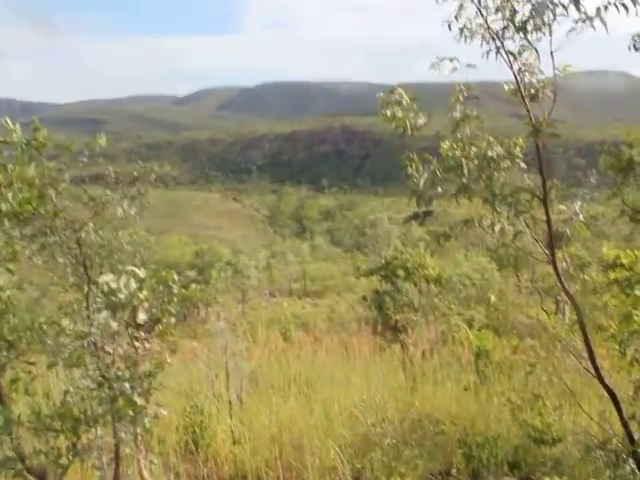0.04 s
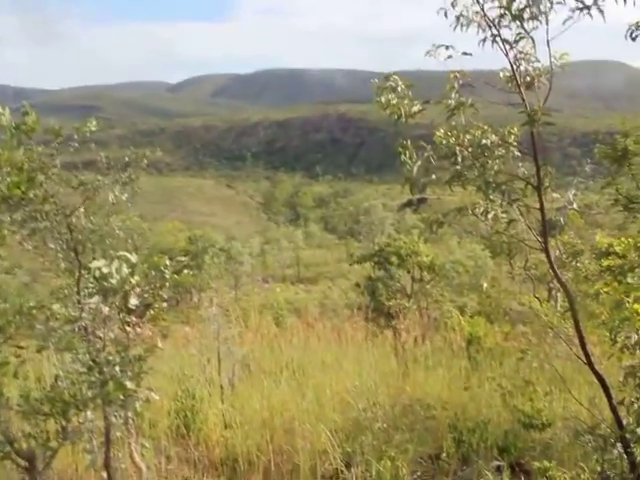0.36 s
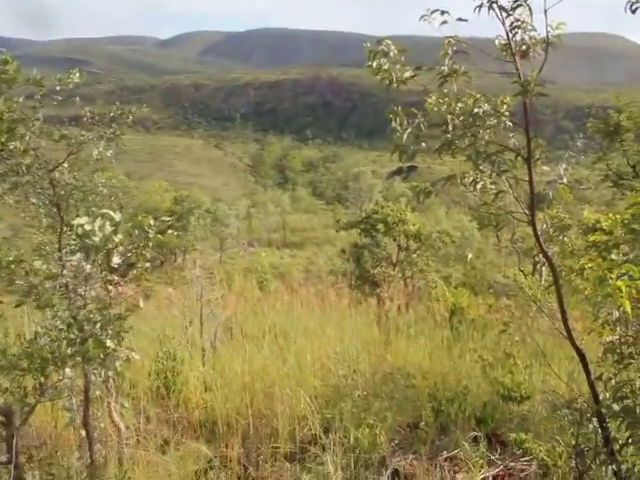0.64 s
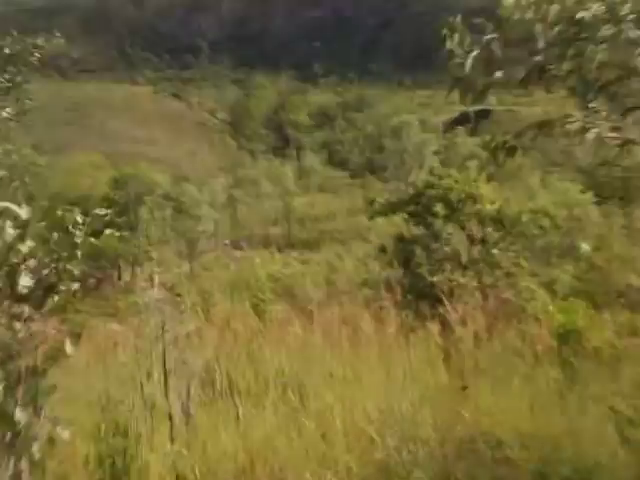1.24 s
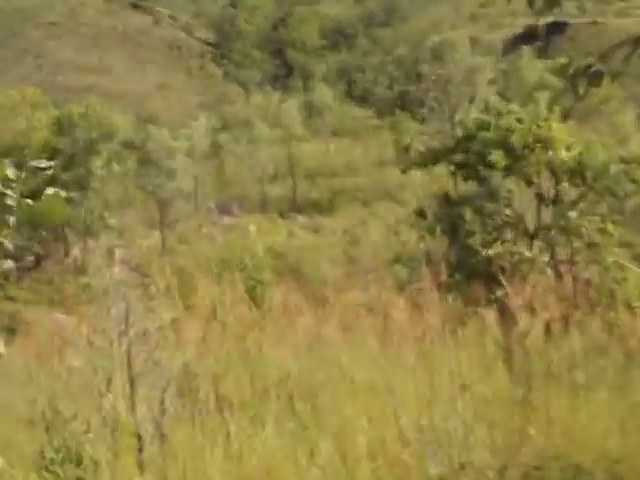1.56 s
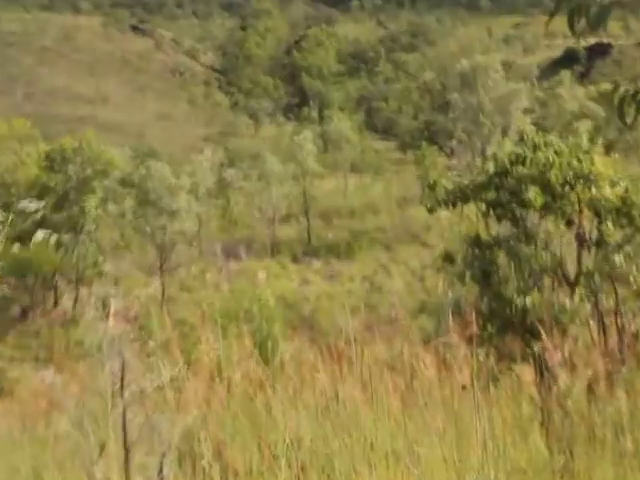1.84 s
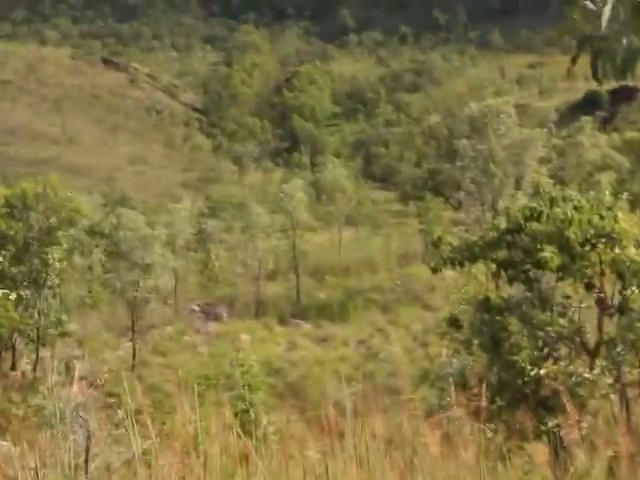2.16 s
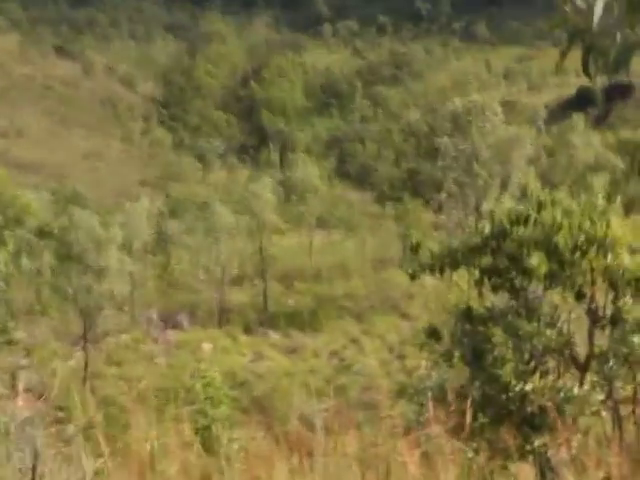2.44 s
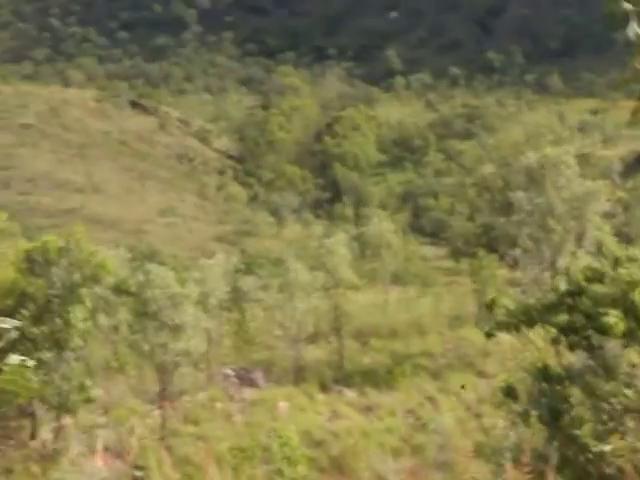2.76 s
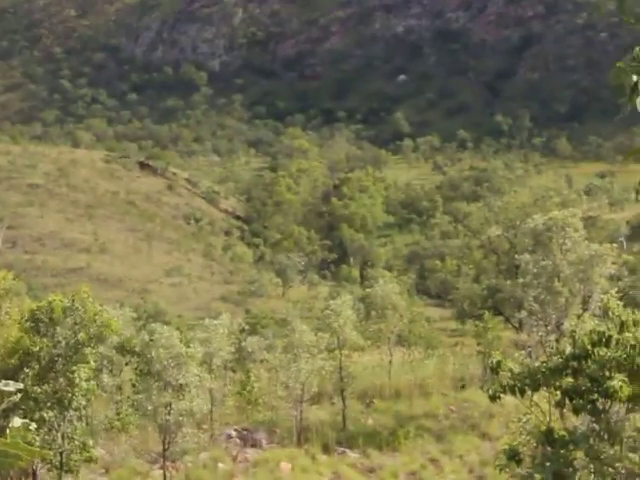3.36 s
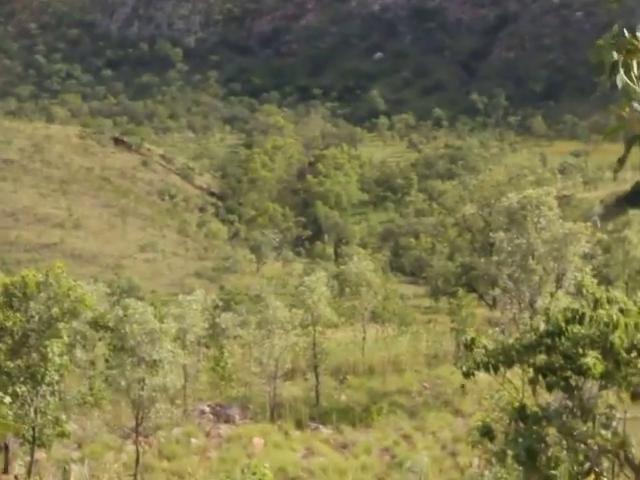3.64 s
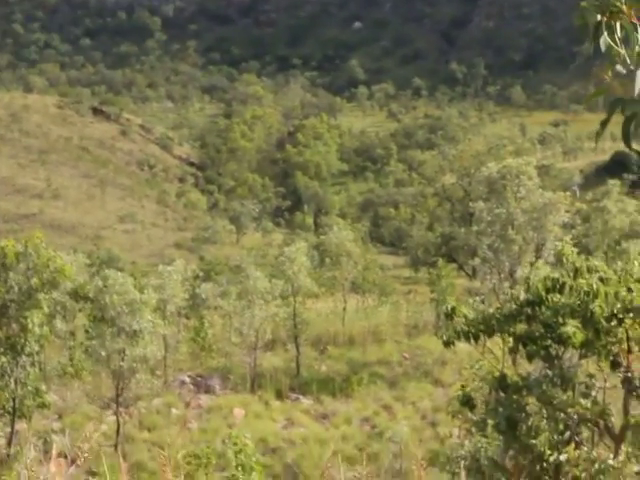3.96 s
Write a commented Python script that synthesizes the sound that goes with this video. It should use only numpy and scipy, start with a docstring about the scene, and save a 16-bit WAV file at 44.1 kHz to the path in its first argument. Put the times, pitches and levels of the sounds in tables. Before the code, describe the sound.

A songbird whistles pure notes and falling slurs in an open valley: at the start, around 1.5 to 1.9 seconds, then repeatedly from 2.5. A close, high cricket chirps about six times a second throughout, over faint air and distant insects. Fingers rub and knock the camera from 0.9 to 2.4, ending with the sharpest knock. Dry rustles follow; another bird squeaks at 2.7 and rasps at 3.5 and 3.8.

```python
"""A songbird whistles slow, pure notes and slurs across a grassy valley, while a close cricket chirps
about six times a second, each chirp a run of wing strokes. In the middle, fingers rub, creak and knock
on the camera body. Later come dry rustles, and a second bird squeaks and rasps twice from the trees.
A few dry snaps dot the scene; faint air and a far insect chorus lie underneath."""
import sys
import numpy as np
from scipy import signal
from scipy.fft import rfft, irfft
from scipy.io import wavfile
from scipy.ndimage import uniform_filter1d

SR = 44100
rng = np.random.default_rng(int(sys.argv[2]) if len(sys.argv) > 2 else 0)


def pcm_store(signal):
    """Save signal as 16-bit PCM."""
    levels = np.round(np.clip(np.atleast_2d(signal), -1, 1) * 32767)
    wavfile.write(sys.argv[1], SR, levels.astype(np.int16).T)


N = 176400
T = np.arange(N) / SR

# The songbird's tune. Each row: start and length in seconds, first and last pitch in Hz, glide
# exponent (higher bends later), level in dB, crest of the swell as a share of the length.
SONG_NOTES = [(-.05, 0.4635, 1497, 1474, 1.97, -32, 0.314), (1.544, 0.1287, 1317, 989, 7.1, -26, 0.817),
              (1.794, 0.1362, 1168, 1138, 1.72, -29, 0.543),
              (2.45, 0.4989, 1243, 1273, 0.216, -28.5, 0.619),
              (3.075, 0.0621, 1499, 592.4, 1.164, -31.5, 0.301),
              (3.19, 0.0959, 1825, 1662, 0.318, -24, 0.592), (3.403, 0.1964, 1503, 1445, 0.81, -24, 0.701),
              (3.646, 0.0802, 1377, 807, 3.49, -31, 0.559), (3.825, 0.169, 916, 914.7, 0.77, -44, 0.643)]
# The second bird's rasps. Each row: start and length in seconds, level in dB.
RASP_CALLS = [(3.546, .08, -27.5), (3.795, .073, -28)]
# Its throat. Each row: frequency in Hz, relative gain in dB.
THROAT_EQ = [(1500, -46.5), (2200, -20.5), (2950, -19.5), (3400, -31), (4500, -7), (5100, -1.5),
             (5800, -24), (15000, -35.5)]
# Its squeaks. Each row: start and length in seconds, first, middle and last pitch in Hz, level in dB.
SQUEAK_NOTES = [(2.651, 0.026, 2265, 2311, 2520, -45.5), (2.67, 0.0384, 3056, 2608, 2729, -38),
                (3.772, 0.041, 2284, 2217, 2215, -37.5)]
# A squeak's timbre. Each entry: gain of one harmonic in dB, from the fundamental up.
SQUEAK_HARMONICS_DB = [-4, 0, -10, -13, -16]
# The cricket's rhythm. Each entry: time of a chirp's last stroke in seconds.
CHIRP_ENDS = [0.1399, 0.316, 0.4847, 0.6542, 0.836, 1.0068, 1.191, 1.361, 1.5318, 1.702, 1.8755, 2.06,
              2.231, 2.4116, 2.5854, 2.7612, 2.9328, 3.1053, 3.277, 3.4588, 3.64, 3.811, 3.9809]
# Its vigour. Each row: time in seconds, full-strength strokes per chirp, base level in dB.
CRICKET_VIGOUR = [(1.4, 4, -32), (2.8, 5.4, -29.5)]
# Finger rubs. Each row: start and length in seconds, bass level in dB, treble over bass in dB.
FINGER_RUBS = [(.885, 0.0171, -21.5, 1), (0.907, 0.0459, -29, -10), (1.025, 0.0068, -20.5, -4.5),
               (1.036, 0.01366, -25, -7.5), (1.057, 0.1751, -31, -8.5), (1.28, 0.041, -35, -6.5),
               (1.322, 0.2047, -32.5, -4.5), (1.573, 0.03636, -31.5, -1), (1.669, 0.04024, -34.5, -4),
               (1.729, 0.00728, -32, -1.5), (1.786, 0.01303, -27, -2), (1.797, 0.0403, -35.5, -3.5),
               (1.877, 0.1594, -35.5, -2), (2.053, 0.0611, -37.5, -5.5), (2.178, 0.0418, -34.5, -1.5),
               (2.284, 0.015, -29.5, -3.5), (2.294, 0.0247, -33, -5), (2.385, 0.0271, -27, -8.5),
               (2.447, 0.0102, -36, 0)]
# The rubbed shell. Each row: frequency in Hz, relative gain in dB.
SHELL_EQ = [(25, -41), (45, -10.5), (307, -1), (800, -1.5), (2030, 3), (2500, -1.5), (4010, 3), (6400, -11),
            (15500, -17.5)]
# Singing finger drags. Each row: start and length in seconds, centre and width in Hz, level in dB.
FINGER_DRAGS = [(1.318, 0.152, 3835, 650, -36), (1.817, 0.167, 3465, 453, -40),
                (1.976, 0.059, 3320, 605, -30.5)]
# The creaking shell. Each row: frequency in Hz, relative gain in dB.
CREAK_EQ = [(160, -15), (480, 5), (1000, -15.5), (1700, 2.5), (5500, -14.5), (7000, -38)]
# Knocks on the body. Each row: start in seconds, peak in dB, decay time in seconds.
KNOCK_HITS = [(0.8895, -23, 0.00075), (.8995, -8, 0.00115), (1.022, -11.5, 0.0017), (1.5735, -15, 0.00102),
              (1.5958, -16, .0006), (1.7856, -6, 0.001), (2.2804, -7, 0.001006), (2.3854, -10.5, 0.00117),
              (2.4128, 4, 0.000903)]
# The knocked shell. Each row: frequency in Hz, relative gain in dB.
KNOCK_EQ = [(60, -4.5), (200, -6.5), (1800, 2.5), (4000, -8), (8000, -19.5)]
# Thuds that shake the case. Each row: start in seconds, strength in dB.
THUD_HITS = [(.9218, -9), (2.415, -5.5)]
# The case's modes. Each row: frequency in Hz, gain in dB, seconds to die away by 60 dB.
CASE_MODES = [(203.6, -14.5, 0.0226), (405, -19.5, 0.02), (994, -11.5, 0.0375)]
# Dry snaps. Each row: start in seconds, centre in Hz, peak in dB, decay time in seconds.
SNAP_HITS = [(.549, 3237, -27, 0.0044), (1.294, 3850, -13, 0.00048), (1.733, 4200, -20, 0.0036),
             (2.452, 4240, -22, 0.0044)]
# Dry rustles. Each row: start and length in seconds, level in dB.
RUSTLE_BURSTS = [(2.84, 0.0104, -36), (2.999, 0.0318, -38), (3.047, .003, -33.5), (3.325, 0.0121, -35.5),
                 (3.485, 0.0071, -32.5), (3.5, 0.0065, -24), (3.529, 0.0302, -32), (3.657, 0.0032, -29.5)]
# The colour of rustles and grass hiss. Each row: frequency in Hz, relative gain in dB.
RUSTLE_EQ = [(400, -40.5), (1500, 1), (4800, 3.5), (6500, -6), (11000, 4)]
# The fader ride of the grass hiss. Each row: time in seconds, level in dB.
HISS_RIDE = [(0, -48.5), (.5, -50), (.75, -65.5), (3.3, -65.5), (3.41, -40.5), (4, -69)]
# The colour of the air. Each row: frequency in Hz, relative gain in dB.
AIR_EQ = [(25, -5), (150, -5.5), (310, 2), (800, -3), (1600, -1), (2700, -9.5), (3900, -6.5), (16000, -37)]
# The colour of the far crickets. Each row: frequency in Hz, relative gain in dB.
CHORUS_EQ = [(6000, -46.5), (6900, -7.5), (7600, 0.5), (8400, 0.5), (9200, -19)]

SKIN_ATTACK_S, SKIN_RELEASE_S = 0.0042, 0.00721


def songbird(sway_hz=5.47, sway_depth=0.00306):
    """Near-pure whistles swell, glide and fade; the voice breaks up on wide slurs."""
    out = np.zeros(N)
    waver, tremble = 1 + 0.00105 * drift(90), drift(220)
    for start, length, first, last, bend, db, crest in SONG_NOTES:
        i, u = span(start, length)
        sway = 1 - sway_depth * np.cos(2 * np.pi * sway_hz * (T[i] - start))
        phase = phase_of((first + (last - first) * u ** bend) * sway * waver[i])
        arch = np.abs(np.sin(np.pi * np.interp(u, [0, crest, 1], [0, .5, 1])))
        slur = abs(np.log(first / last))
        swell = arch ** (1.446 + 1.36 * slur)  # wider slurs swell more sharply
        roughness = undb(5 * min(slur, .5) * tremble[i])
        out[i] += np.sqrt(2) * undb(db) * swell * roughness * np.sin(phase)
    flutter = undb(0.92 * drift(50))
    return valley_echo(out * flutter, wet_db=-19)


def bird_rasps(pitch_hz=753.8, sag=0.07, jitter=.028, breath=0.88):
    """A harsh, jittering, breathy voice sounds through a sharp throat resonance."""
    out = np.zeros(N)
    for start, length, db in RASP_CALLS:
        droop = 1 - sag * np.clip((T - start) / length, 0, 1)
        phase = phase_of(pitch_hz * droop * (1 + jitter * drift(900)))
        buzz = unit(sum(np.cos(k * phase) for k in range(2, 13)))
        voice = colour(buzz + breath * noise(), THROAT_EQ)
        out += undb(db) * gate(start, length, 0.0173, 0.0054) * voice
    return valley_echo(out, wet_db=-7)


def bird_squeaks():
    """The rasping bird's thin squeaks: shaky, curving tones, strongest in the second harmonic."""
    out, shake = np.zeros(N), 1 + .01 * drift(600)
    for start, length, first, middle, last, db in SQUEAK_NOTES:
        i, u = span(start, length)
        curve = np.polyfit([0, .5, 1], [first, middle, last], 2)
        phase = phase_of(np.polyval(curve, u) * shake[i])
        tone = sum(undb(gain) * np.sin(k * phase) for k, gain in enumerate(SQUEAK_HARMONICS_DB, 1))
        out[i] += undb(db) * np.sin(np.pi * u) * tone
    return valley_echo(out, wet_db=-2.5)


def cricket(pitch_hz=7552.3, fall_hz=697, strokes=9, stroke_s=0.0081, spacing_s=.0109):
    """Each wing stroke is a short falling tone; the strokes grow louder and higher through a chirp."""
    out, scrape_hz = np.zeros(N), 55 * drift(900)
    times, *vigour = np.array(CRICKET_VIGOUR).T
    for end in CHIRP_ENDS:
        full_strokes, base_db = (np.interp(end, times, column) for column in vigour)
        for k, (force, detune, slip) in enumerate(rng.standard_normal((strokes, 3))):
            early = np.clip(k + 1 - full_strokes, 0, 3.3)  # k counts back from the last stroke
            i, u = span(end - k * spacing_s - stroke_s / 2 + 0.000067 * slip, stroke_s)
            centre_hz = pitch_hz - 163.5 * early + 25 * detune
            phase = phase_of(centre_hz - fall_hz * (u - .5) + scrape_hz[i])
            tone = np.sin(phase) + undb(-27) * np.sin(2 * phase)
            stroke_db = base_db + 4 - 3.5 * early + 0.41 * force
            out[i] += undb(stroke_db) * np.sin(np.pi * u) * tone
    ground_bounce = undb(-6) * np.interp(T - 0.0023, T, out)
    return valley_echo(out + ground_bounce, wet_db=-16.5)


def fingers(low_hz=2213, high_hz=6285):
    """Skin sticks and slips on the shell; each rub has its own brightness, and drags make the body sing."""
    friction = colour(noise() * undb(2.5 * drift(2500)), SHELL_EQ)
    lag_s = .0032 * (1 + 0.069 * drift(5.5))  # the shifting hand moves the body's resonances
    friction += sum(0.239 ** k * np.interp(T - k * lag_s, T, friction) for k in range(1, 4))
    out = np.zeros(N)
    for edge, kind, tilt in [(low_hz, "low", 0), ([low_hz, high_hz], "band", 0.44), (high_hz, "high", 1)]:
        band = unit(signal.sosfiltfilt(signal.butter(4, edge, kind, fs=SR, output="sos"), friction))
        rubs = [undb(db + tilt * treble_db) * gate(start, length, SKIN_ATTACK_S, SKIN_RELEASE_S)
                for start, length, db, treble_db in FINGER_RUBS]
        out += band * np.max(rubs, axis=0)
    for start, length, hz, width, db in FINGER_DRAGS:
        catches = noise() * undb(5 * drift(450))
        out += undb(db) * gate(start, length, 0.013, 0.0063) * unit(resonate(catches, hz, width))
    patchiness = undb(0.9376 * drift(110))
    return out * patchiness


def creak(start=1.238, length=0.0337, slip_hz=161.5, db=-35.5):
    """For a moment the skin slips at a regular rate and the shell buzzes."""
    phase = phase_of(slip_hz * (1 + .01 * drift(300)))
    slips = sum(np.cos(k * phase + 2 * np.pi * rng.random()) for k in range(1, 42))
    return undb(db) * gate(start, length, SKIN_ATTACK_S, SKIN_RELEASE_S) * colour(slips, CREAK_EQ)


def knocks():
    """Very short contacts ring the damped shell."""
    cepstrum = irfft(log_gain(KNOCK_EQ, size=512))
    cepstrum[1:256] *= 2  # folding to minimum phase keeps the attack crisp
    cepstrum[257:] = 0
    shell = irfft(np.exp(rfft(cepstrum)))
    out = np.zeros(N)
    for start, db, decay in KNOCK_HITS:
        i, _ = span(start, .02)
        contact = noise(len(i)) * np.exp(-(T[i] - start) / decay)
        knock = signal.lfilter(shell, 1, contact)
        out[i] += undb(db) * knock / np.abs(knock).max()
    return out


def thuds():
    """Heavier bumps shake the case, and its low modes ring briefly."""
    out = np.zeros(N)
    for start, strength_db in THUD_HITS:
        age = np.maximum(T - start, 0)
        for hz, db, t60 in CASE_MODES:
            out += undb(strength_db + db - 60 * age / t60) * np.sin(2 * np.pi * hz * age)
    return out


def snaps(width_hz=2440):
    """Single dry snaps, each a tiny noise burst with its own short ring."""
    out = np.zeros(N)
    for start, hz, db, decay in SNAP_HITS:
        i, _ = span(start, 10 * decay)
        burst = noise(len(i)) * np.exp(-(T[i] - start) / decay)
        snap = resonate(burst, hz, width_hz)
        out[i] += undb(db) * snap / np.abs(snap).max()
    return out


def rustles(grain_db=6):
    """Short bursts of dry crackle ride over a fine grass hiss."""
    bursts = sum(undb(db) * gate(start, length, 0.00174, 0.00836) for start, length, db in RUSTLE_BURSTS)
    hiss = undb(np.interp(T, *np.array(HISS_RIDE).T) + 2.5 * drift(120))
    crackle = colour(noise() * undb(grain_db * drift(1500)), RUSTLE_EQ)
    return (bursts + hiss) * crackle


def background(air_db=-51.5, chorus_db=-49):
    """A bed of soft moving air and the shimmer of far crickets."""
    air = undb(air_db + 1.2 * drift(4.363)) * colour(noise(), AIR_EQ)
    chorus = undb(chorus_db + 2.2 * drift(70) + 1.3 * drift(8)) * colour(noise(), CHORUS_EQ)
    return air + chorus


def valley_echo(x, wet_db, t60_s=0.385, predelay_s=0.0075):
    """Add the scattered echo of trees and slopes."""
    t = T[:SR]
    tail = noise(SR) * undb(-60 * t / t60_s) * (t > predelay_s)
    return x + undb(wet_db) * signal.fftconvolve(x, tail / np.linalg.norm(tail))[:N]


def undb(db):
    """Decibels to gain."""
    return 10 ** (np.asarray(db) / 20)


def unit(x):
    """Scale to rms 1."""
    return x / (np.std(x) + 1e-12)


def log_gain(eq, size):
    """Natural-log gain of an EQ curve on an FFT grid."""
    hz, db = np.array(eq, float).T
    return np.log(undb(np.interp(np.log(np.fft.rfftfreq(size, 1 / SR) + 1), np.log(hz), db)))


def colour(x, eq):
    """Apply an EQ curve and scale to rms 1."""
    return unit(irfft(rfft(x) * np.exp(log_gain(eq, N)), N))


def resonate(x, hz, width):
    """A steep resonance: two band-passes in a row."""
    b, a = signal.iirpeak(hz, hz / width, SR)
    return signal.lfilter(b, a, signal.lfilter(b, a, x))


def noise(size=N):
    """White noise."""
    return rng.standard_normal(size)


def drift(rate_hz):
    """Smooth random modulation of spread 1."""
    hold = int(SR / rate_hz)
    steps = np.repeat(noise(N // hold + 1), hold)
    return unit(uniform_filter1d(uniform_filter1d(steps, hold), hold)[:N])


def gate(start, length, attack, release):
    """Linear attack, hold and exponential release, all in seconds."""
    rise = np.clip((T - start) / attack + .5, 0, 1)
    return rise * np.exp(-np.clip((T - start - length) / release, 0, 20))


def phase_of(hz):
    """Phase of a moving pitch."""
    return 2 * np.pi * np.cumsum(hz) / SR


def span(start, length):
    """An event's samples i and its progress u from 0 to 1."""
    i = np.flatnonzero((T >= start) & (T < start + length))
    return i, (T[i] - start) / length


def scene():
    """Mix every layer to mono."""
    wildlife = songbird() + bird_rasps() + bird_squeaks() + cricket()
    foley = fingers() + creak() + snaps() + knocks() + thuds() + rustles()
    return (wildlife + foley + background())[None]


def record(dry, top_hz=16000):
    """The camera limits hard at full scale and cuts the top end."""
    lowpass = signal.ellip(10, .2, 80, top_hz, fs=SR, output="sos")
    return signal.sosfilt(lowpass, np.clip(dry, -1, 1))


dry = scene()
out = record(dry)
pcm_store(out)
```